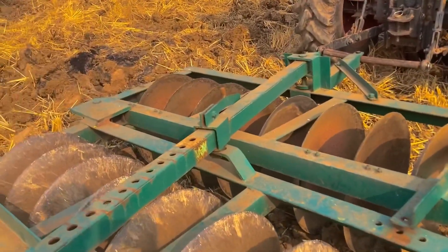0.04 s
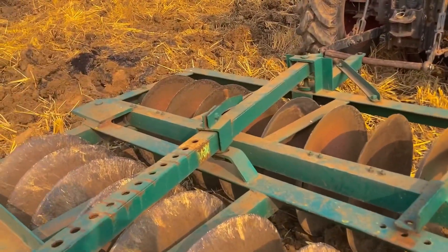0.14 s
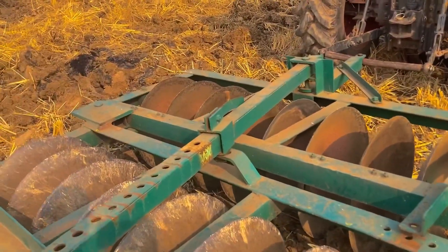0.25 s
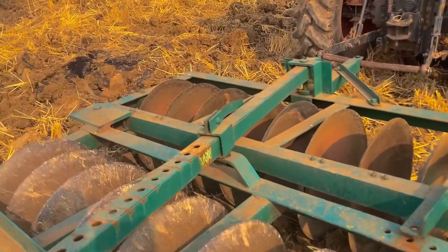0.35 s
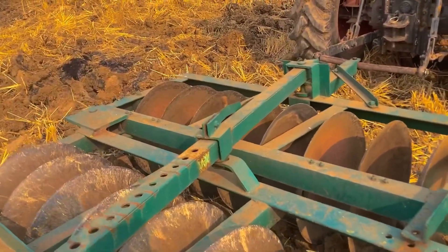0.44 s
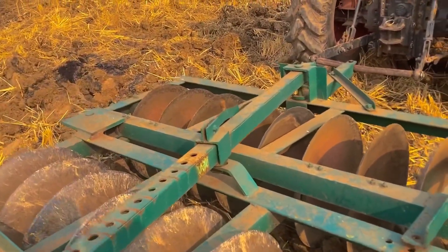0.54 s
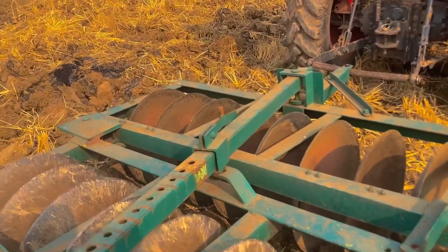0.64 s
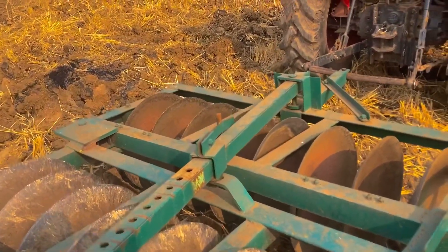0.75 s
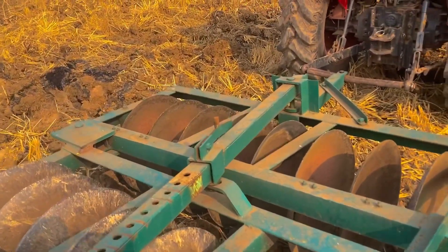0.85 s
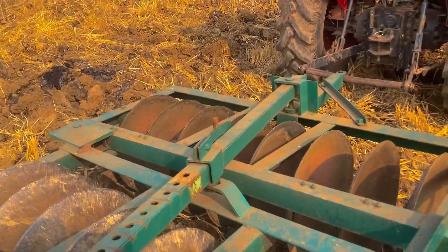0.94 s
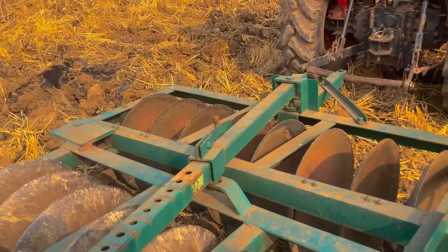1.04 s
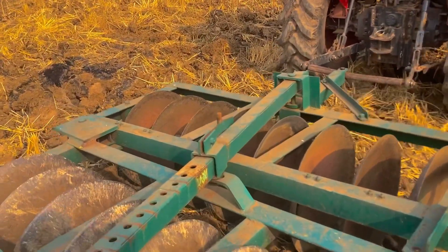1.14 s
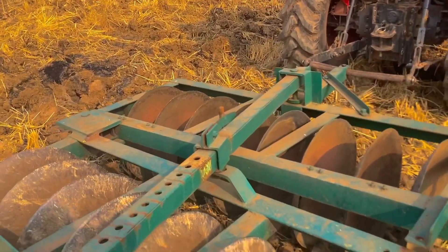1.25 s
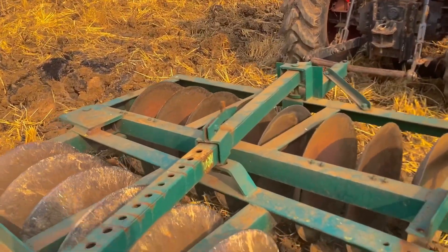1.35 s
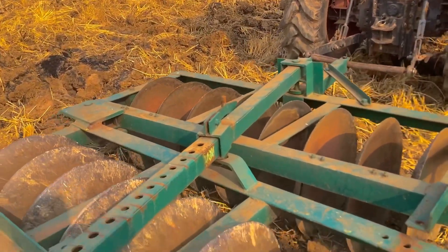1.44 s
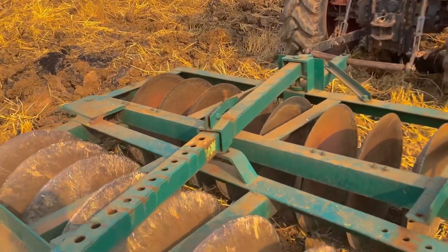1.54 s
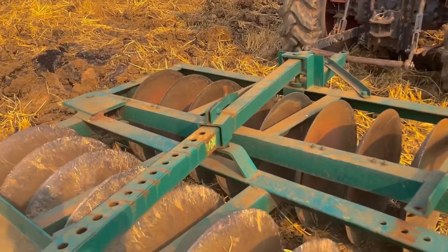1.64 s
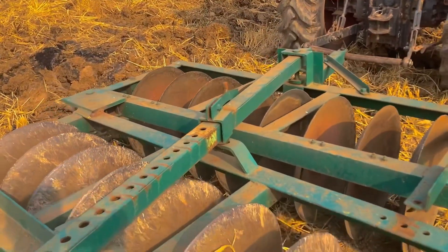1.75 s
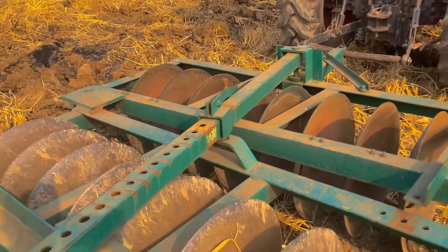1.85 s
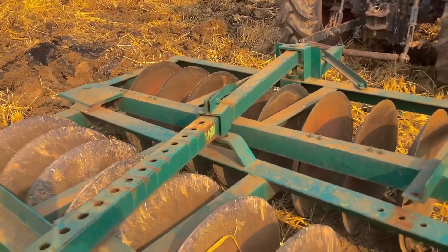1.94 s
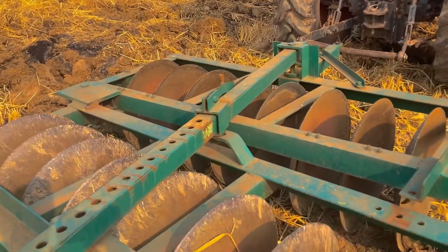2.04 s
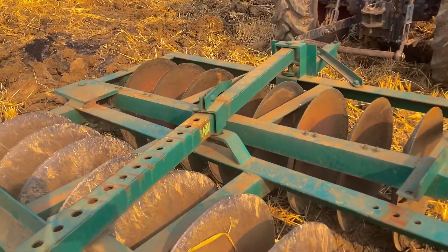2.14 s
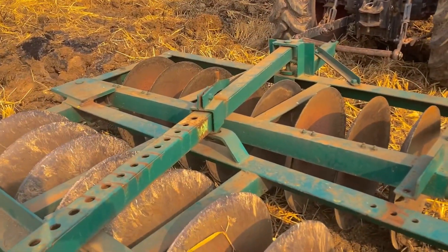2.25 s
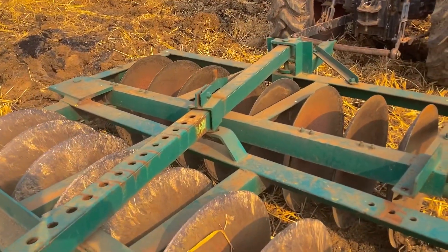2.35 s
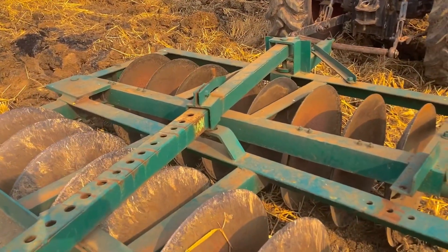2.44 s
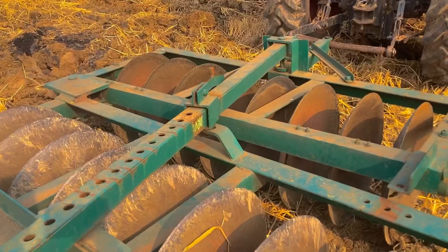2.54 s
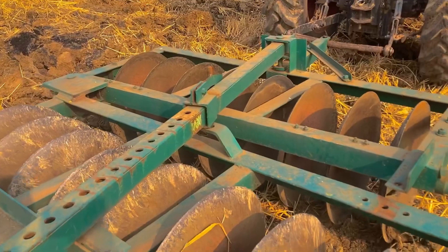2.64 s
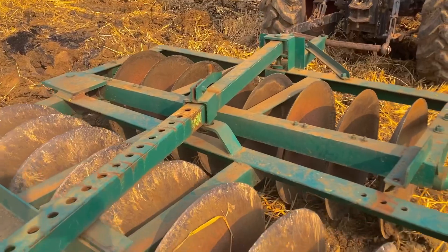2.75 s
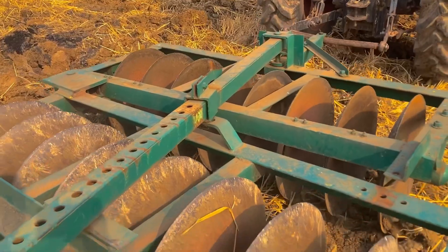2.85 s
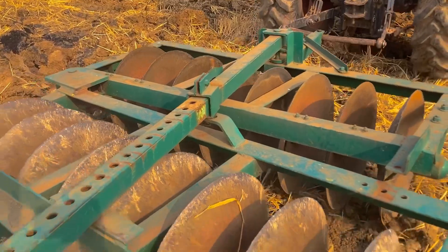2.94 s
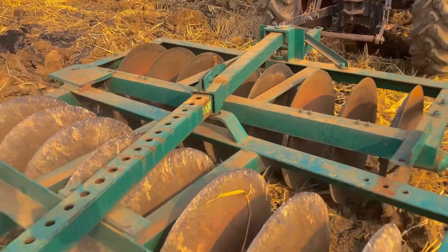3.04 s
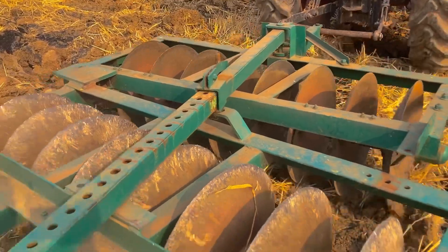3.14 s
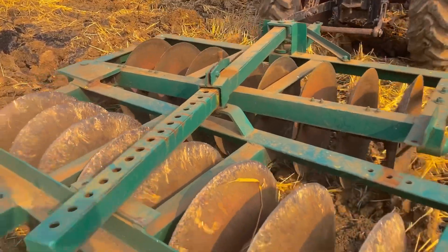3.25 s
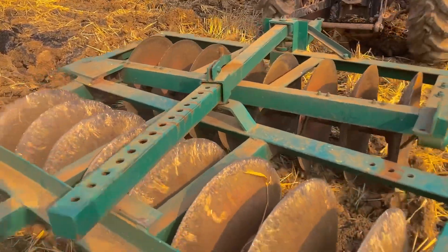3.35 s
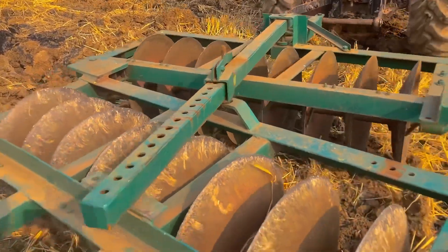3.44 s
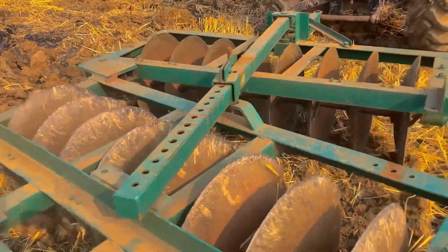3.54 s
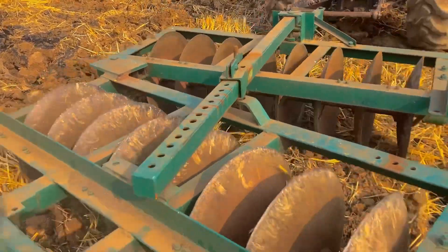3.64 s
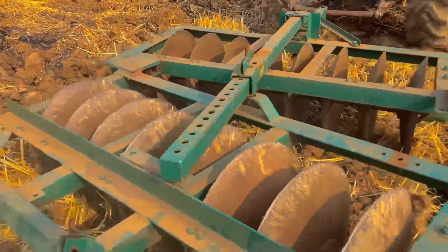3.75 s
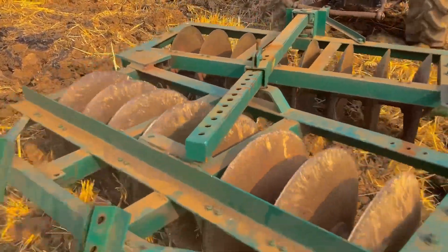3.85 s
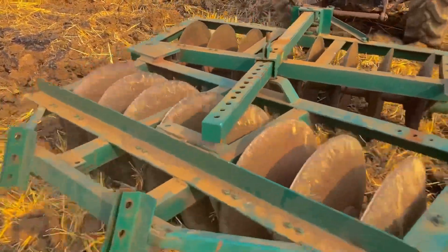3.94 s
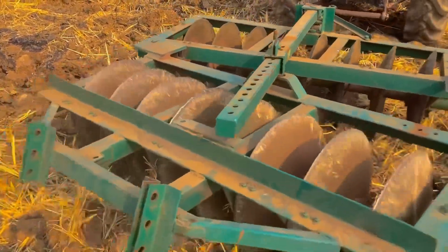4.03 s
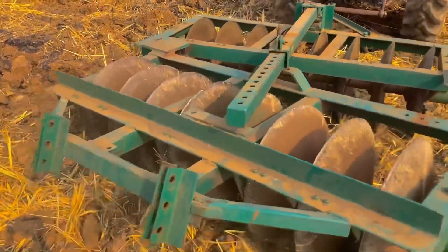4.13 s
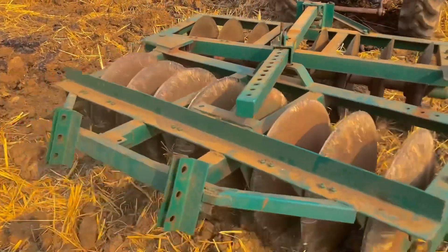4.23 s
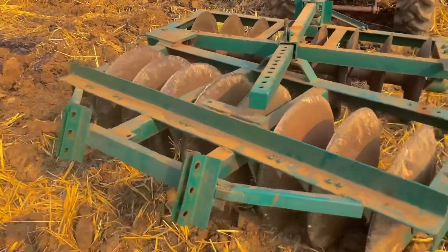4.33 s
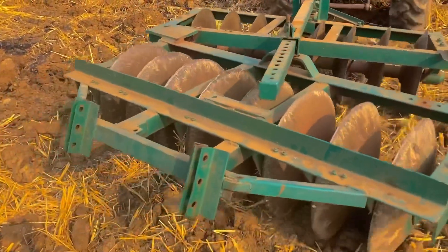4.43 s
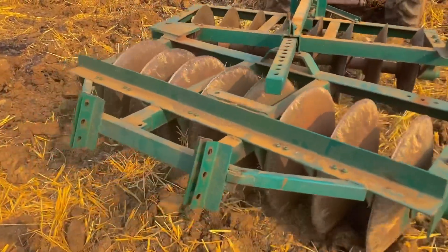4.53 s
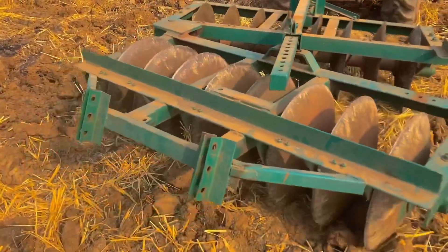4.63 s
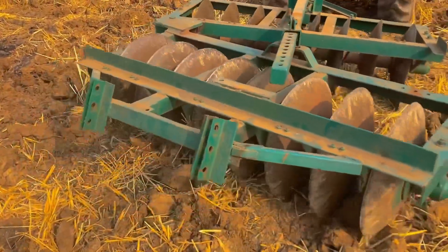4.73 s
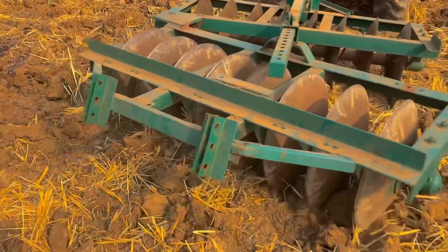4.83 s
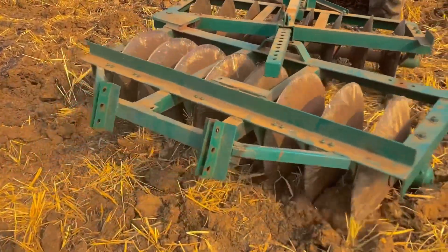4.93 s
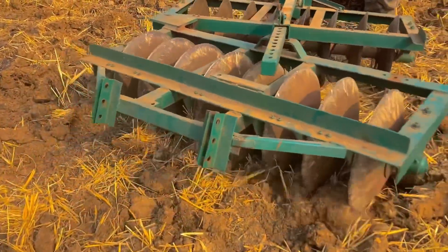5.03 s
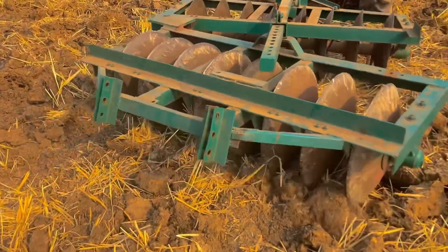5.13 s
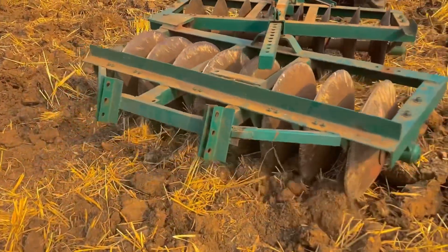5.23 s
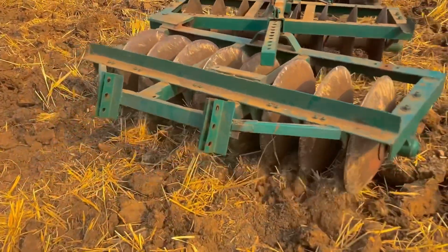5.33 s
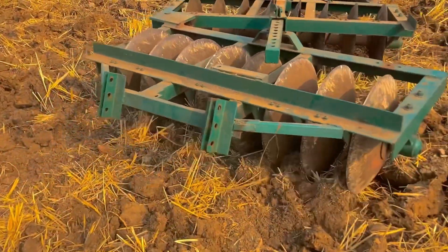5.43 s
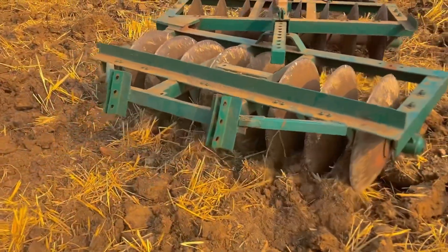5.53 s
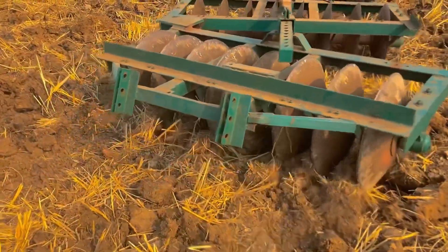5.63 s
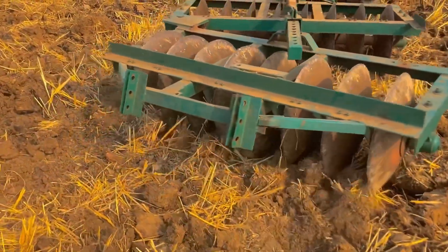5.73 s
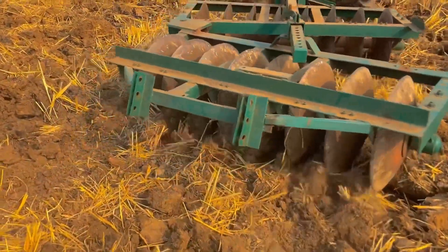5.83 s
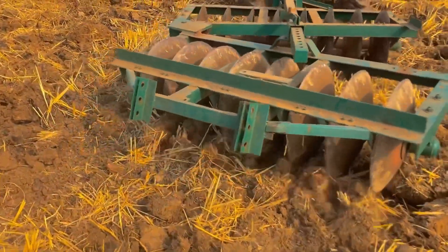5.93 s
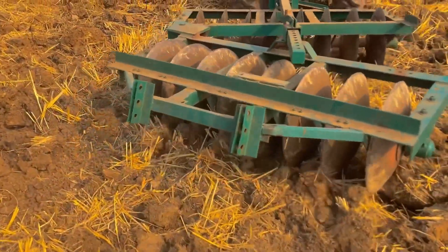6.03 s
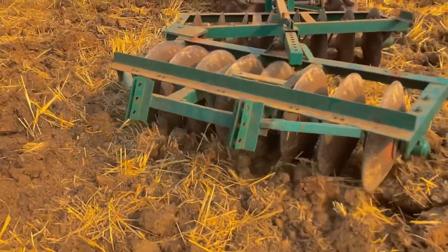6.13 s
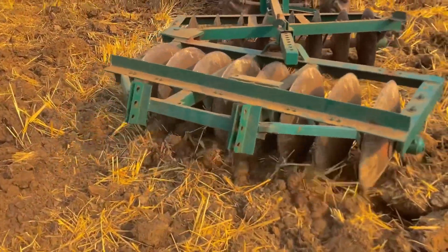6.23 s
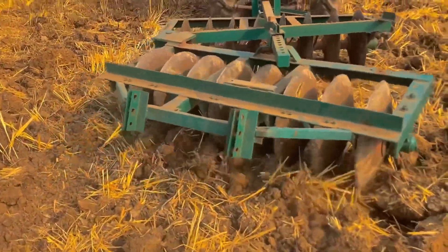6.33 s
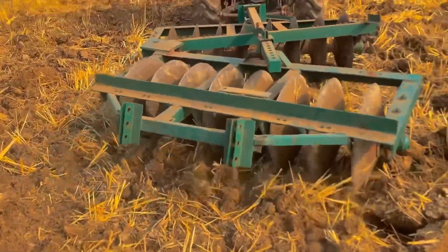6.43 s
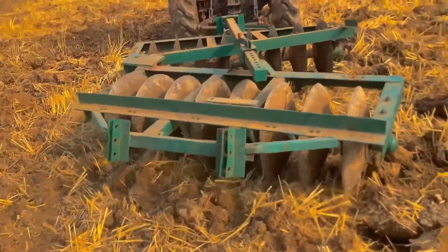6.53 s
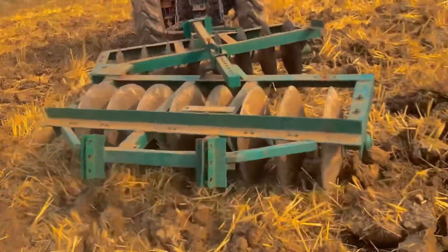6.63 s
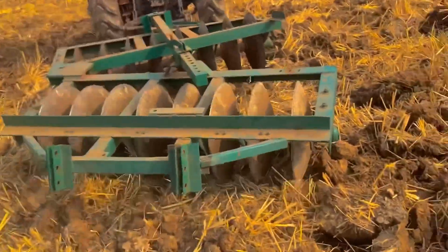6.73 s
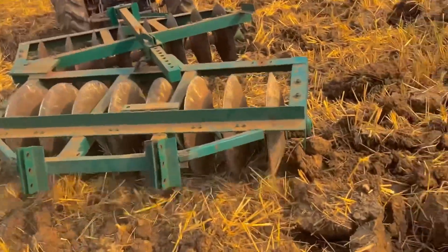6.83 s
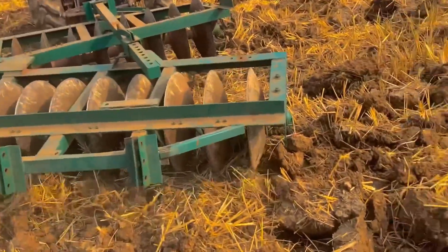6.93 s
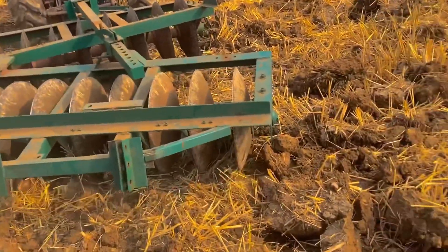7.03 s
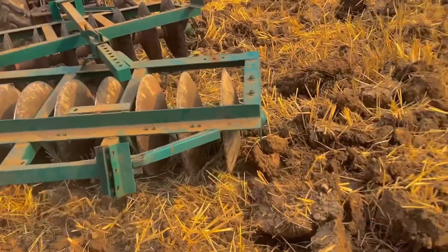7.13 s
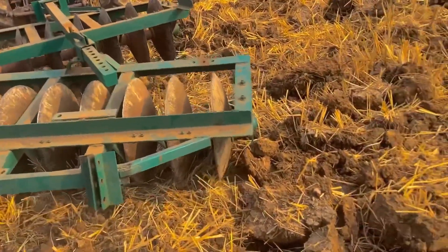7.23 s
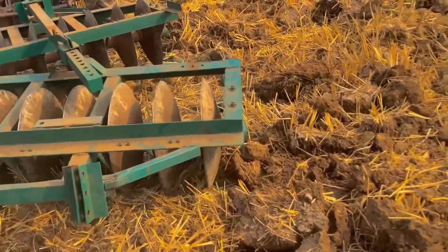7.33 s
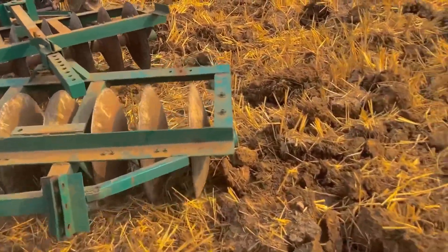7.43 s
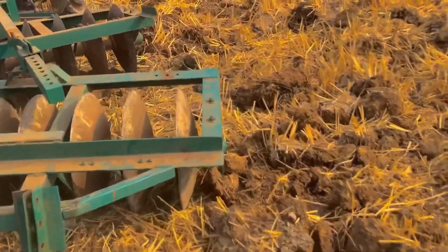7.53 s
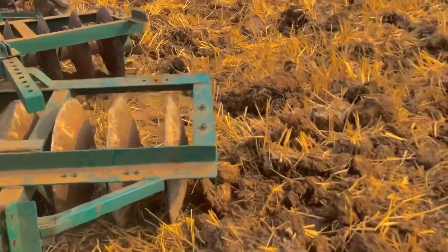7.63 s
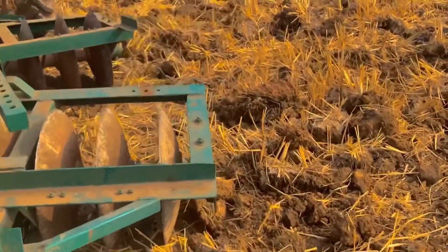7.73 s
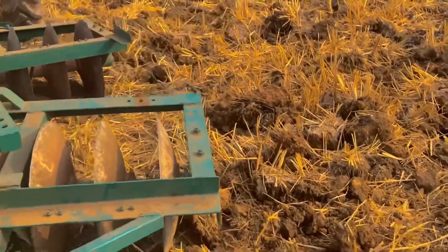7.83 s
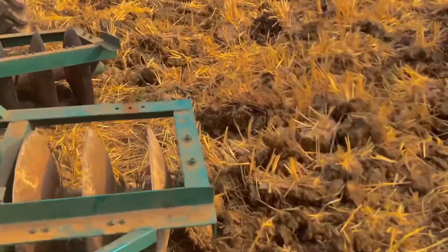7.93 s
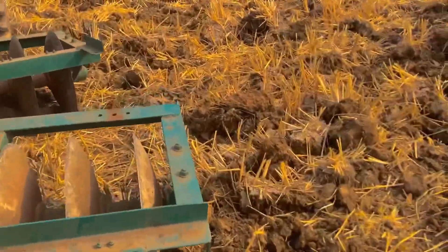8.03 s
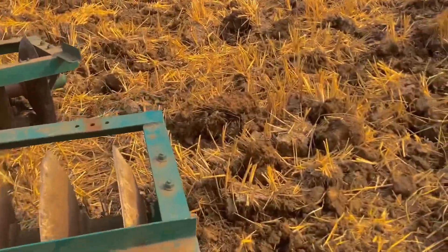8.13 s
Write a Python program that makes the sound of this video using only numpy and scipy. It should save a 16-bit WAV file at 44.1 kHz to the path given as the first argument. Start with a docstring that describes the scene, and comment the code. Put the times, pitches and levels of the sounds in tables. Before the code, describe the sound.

Heard from a phone just behind the harrow: uneven low diesel firings, each a dull thump with a hard knock and hollow boom. After three seconds the rusty discs lurch, banging and screeching through clods. The racket eases into grinding, frame thuds, short groans and crackling straw while the engine rises and falls. Late, it briefly quiets, then bright clanks cluster as the sound leans further left.

```python
"""A dry stubble field: a diesel tractor drags a disc harrow past a phone held just behind it.
Each firing sends a thump down the ringing exhaust, knocks sharply and leaves the engine block booming.
Random steel contacts shake the frame and the ringing discs into grinding, thuds and clanks; rubbing steel
groans and squeaks in wavering tones, and showers of noise make the soil and straw crackle.
Direct and scattered sound reach two ports; it lies to the left from the start and leans further left late on."""
import sys
import numpy as np
from scipy import signal
from scipy.fft import rfft, irfft, next_fast_len
from scipy.io import wavfile
from scipy.ndimage import uniform_filter1d

SR = 44100
rng = np.random.default_rng(int(sys.argv[2]) if len(sys.argv) > 2 else 0)


def file_out(sig):
    """Save sig as 16-bit WAV at sys.argv[1]."""
    # one column per channel
    cols = np.atleast_2d(sig).T
    # limit, then scale
    lim = np.clip(cols, -1, 1)
    pcm = np.round(lim * 32767).astype(np.int16)
    wavfile.write(sys.argv[1], SR, pcm)


N = 360429
TIME = np.arange(N) / SR

# colour of breaking soil and straw: (frequency [Hz], relative level [dB])
SOIL_COLOUR = [(500, -23), (2000, 0.5), (4000, -1.5), (5500, -6.5), (8000, 1), (12000, 3.5), (15500, 0.5)]


def undb(db):
    """Decibels to gain."""
    return 10 ** (np.asarray(db) / 20)


def unit(x):
    """Scale to rms 1."""
    return x / np.sqrt(np.mean(x ** 2))


def curve(table):
    """A (time, value) table, interpolated sample by sample."""
    s, value = np.transpose(table)
    return np.interp(TIME, s, value)


def gain_at(hz, points):
    """Gain of a (Hz, dB) colour at the given frequencies."""
    f, db = np.transpose(points)
    return undb(np.interp(np.log(hz + 1), np.log(f), db))


def response(points, size=8192):
    """Minimum-phase impulse response of a colour, with unit energy."""
    cepstrum = irfft(np.log(gain_at(np.fft.rfftfreq(size, 1 / SR), points)))
    # fold the cepstrum forward in time, so that nothing sounds before the impulse
    cepstrum[1:size // 2] *= 2
    cepstrum[size // 2 + 1:] = 0
    h = irfft(np.exp(rfft(cepstrum)))
    return h / np.linalg.norm(h)


def through(x, h):
    """Pass the direct and the scattered path through an impulse response."""
    return signal.oaconvolve(x, np.atleast_2d(h), axes=1)[:, :N]


def add(out, s, sound):
    """Mix a sound in at time s."""
    i = max(int(s * SR), 0)
    part = out[:, i:i + sound.shape[1]]
    part += sound[:, :part.shape[1]]


def walk(rate):
    """Slow chance: random levels, a new one every 1 / rate s, joined by ramps."""
    hold = int(SR / rate)
    levels = rng.standard_normal(N // hold + 1)
    return uniform_filter1d(np.repeat(levels, hold), hold)[:N]


def grit(rate, spread_db):
    """Tiny fractures at random moments, rate per second, most weak and a few strong."""
    size = undb(spread_db * np.minimum(rng.exponential(size=N), 5))
    struck = rng.random(N) < rate / SR
    return unit(rng.standard_normal((2, N)) * size * struck)


def patchy(x, depth_db, order=5, size=512):
    """Every slip touches the steel elsewhere: the colour changes in patches of about 30 ms."""
    _, _, frames = signal.stft(x, nperseg=size)
    field = rng.standard_normal(frames.shape)
    field = uniform_filter1d(field, order - 1, axis=0)
    field = uniform_filter1d(field, order, axis=1)
    return signal.istft(frames * undb(depth_db * unit(field)), nperseg=size)[1][:, :N]


def exhaust(thump, pipe_hz=93, t60_s=0.2, ring_db=-6.5):
    """Each pressure wave leaves the pipe and sets its air column ringing; firings in step with it make it hum."""
    t = TIME[:SR // 3]
    column = np.cos(2 * np.pi * pipe_hz * t) * undb(-60 * t / t60_s)
    ringing = signal.oaconvolve(thump, column)[:N]
    return unit(unit(thump) + undb(ring_db) * unit(ringing))


def block_ring(starts, strength, scatter_db=5.0, detune=0.02, rise_s=0.0019):
    """Each combustion strikes the modes of the block and covers, never twice in the same blend or tuning."""
    # block and cover modes: (centre pitch [Hz], mean level [dB], 60 dB decay [s])
    block_modes = [(300, 2, 0.16), (444, -2.5, 0.078), (970, -1.5, 0.079), (1190, -5.5, 0.083),
                   (1390, -4, .05), (1680, -8, .05), (2044, -6.5, 0.074), (2850, -12, .04)]
    t = TIME[:SR // 12]
    hz, db, t60 = np.transpose(block_modes)[:, :, None]
    fade = undb(db - 60 * t / t60)
    rise = 1 - np.exp(-t / rise_s)
    out = np.zeros((2, N))
    chance = rng.standard_normal((len(starts), 3, len(hz), 1))
    for i, (size, pitch, phase) in zip(starts, chance):
        swing = np.exp(2j * np.pi * (hz * (1 + detune * pitch) * t + phase))
        ring = np.sum(fade * undb(scatter_db * size) * swing, axis=0)
        add(out, i / SR, strength[i] * rise * np.array([ring.real, ring.imag]))
    return unit(out)


def engine(pulse_hz=68, pulse_s=0.011, lag_s=0.0094, knock_lag_s=0.00299, knock_rise_s=0.0055,
           knock_s=0.025, uneven_db=1.1, injection_db=-8.0, ring_db=-9, lull_knock_share=0.64):
    """Every firing sends a pressure wave out of the pipe, knocks sharply and leaves the block booming."""
    # engine speed, sagging under load and picking up: (time [s], firings [per s])
    speed = [(0.0, 14.99), (0.95, 14.35), (1.08, 12.65), (2.09, 13.87), (2.3, 12.18), (2.57, 13.03),
             (3.14, 8.41), (3.42, 16.4), (3.75, 23.83), (3.84, 21.6), (4.02, 14.6), (4.21, 21.0),
             (4.36, 16.9), (4.6, 15.04), (4.74, 16.04), (5.63, 13.65), (5.85, 15.94), (6.1, 22.34),
             (6.36, 25.73), (6.61, 17.42), (8.17, 19.92)]
    # engine effort, as the level of the exhaust beat before the lulls: (time [s], level [dB])
    effort = [(0, -36), (0.36, -37.5), (0.45, -34), (0.78, -37.5), (0.9, -35.5), (1.4, -35.5), (3.15, -34),
              (3.4, -30), (3.7, -26.5), (3.93, -36), (4.5, -38), (4.72, -31), (5.75, -29.5), (5.95, -29),
              (6.02, -24), (6.36, -24), (6.41, -36), (6.5, -37), (6.83, -24.5), (6.98, -34.5), (7.75, -30),
              (8.17, -34)]
    # loose rumble of gas against the exhaust pulses: (time [s], level [dB])
    gas_share = [(0, -6), (2.6, -6), (4.2, -1), (5.8, -4), (6.35, -9), (6.6, 0), (8.17, -1)]
    # a few beats go soft as the fuel is cut: (time [s], half length [s], exhaust dip [dB])
    lulls = [(0.25, 0.12, 8.5), (0.66, 0.089, 5.5), (1.073, 0.19, 4.5), (4.98, 0.18, 7), (6.71, 0.12, 9)]
    # firings that knock harder than the rest: (time [s], extra level [dB])
    hard_firings = [(0.296, 5), (0.51, 1.5), (0.71, 0.5), (0.92, 3.5), (2.2, 3)]
    # the knock and ring fade as the tractor draws away: (time [s], level [dB])
    receding = [(0, 0.5), (4.0, 0.5), (7.0, -1), (8.17, -10)]
    # colours of the exhaust gas, the block's boom and the knock: (frequency [Hz], relative level [dB])
    pipe_colour = [(20, -34), (30, -7), (42, -4), (72, -9.5), (98, -0.5), (125, -6.5), (145, -13.5),
                   (200, -25), (400, -49), (900, -79)]
    block_colour = [(80, -11), (170, -11), (250, 1), (330, -1.5), (470, -3), (650, -19), (1000, -7.5),
                    (1400, -30.5), (2800, -29), (5000, -50), (15000, -51)]
    knock_colour = [(400, 2.5), (680, -8), (1000, 4), (1380, -5), (1700, 3), (2050, -1.5), (2500, -10),
                    (2850, -13), (4000, -20.5), (7000, -20), (15000, -20)]

    rate = curve(speed)
    effort_db = curve(effort)
    lull_db = sum(depth * np.exp(-((TIME - s) / half) ** 2) for s, half, depth in lulls)
    # the block sits at -42 dB for an effort of -35 dB and gains 0.54 dB per dB of effort
    block_db = -42 + 0.54 * (effort_db + 35) - lull_knock_share * lull_db
    turns = np.cumsum(rate) / SR + 2 / 3  # one whole turn per firing
    age = (turns % 1) / rate
    # time from the nearest pressure peak and since the last diesel knock
    peak = ((turns - lag_s * rate + .5) % 1 - .5) / rate
    burn = ((turns - knock_lag_s * rate) % 1) / rate

    # exhaust: the pulses stay on the direct path, the gas is on both
    thump = np.exp(-(peak / pulse_s) ** 2) * np.cos(2 * np.pi * pulse_hz * peak)
    pulses = exhaust(thump) * np.array([[1], [0]])
    gas = through(rng.standard_normal((2, N)) * (np.exp(-age / .03) + .35), response(pipe_colour))
    rumble = undb(curve(gas_share))
    pipe = (pulses + rumble * unit(gas)) / np.hypot(1, rumble)

    swell = 2 * (1 - np.exp(-age / .009)) * np.exp(-age / .028) + .33
    boom = through(grit(7000, 1.5) * swell, response(block_colour))

    # each firing knocks with its own strength
    firing = (turns - knock_lag_s * rate).astype(int)
    firing_db = uneven_db * rng.standard_normal(N // 1000)
    for s, db in hard_firings:
        firing_db[firing[int(s * SR) + SR // 50]] += db
    strength = undb(firing_db)[firing]
    burst = (1 - np.exp(-burn / knock_rise_s)) * np.exp(-(burn / knock_s) ** 3) * strength + 0.19
    knock = through(grit(7000, 1.5) * burst * undb(1.2 * walk(160)), response(knock_colour))
    ring = block_ring(np.flatnonzero(np.diff(firing)), strength)

    near = undb(curve(receding))
    body = patchy(unit(boom) + undb(injection_db) * unit(knock) * near, depth_db=1.5)
    block = body + undb(ring_db) * ring * near
    return pipe * undb(effort_db - lull_db) + block * undb(block_db)


def discs(force, ring_db, damping, waver_s=0.001218):
    """Steel discs in soil: a dead clatter plus their ringing modes, which waver in pitch as the load shifts."""
    # disc modes: (pitch [Hz], relative level [dB], 60 dB decay before the damping by soil [s])
    disc_modes = [(472, -1, 0.61), (768, 0, 1), (840, -21, 0.087), (910, -3, 0.24), (967, 8, 0.49),
                  (978, 7.5, 0.57), (1100, 2, 0.44), (1300, 13, 0.15), (1290, -9, 0.43), (1517, 7, 0.78),
                  (1639, 12, 0.26), (1780, -14, 0.2), (2015, 7, 0.46), (2250, -22, 0.067), (2636, 5, 0.38),
                  (2630, -11, 0.23), (2900, 2.5, 0.44), (3153, 11, 0.086), (3550, 1, 0.35), (3916, 5, 0.18),
                  (4280, 3, 0.17), (4530, -11, 0.15), (5150, 1, 0.14), (6800, -5.5, 0.32)]
    # dead clatter of the steel: (frequency [Hz], relative level [dB])
    steel_colour = [(150, -6.5), (400, -4), (620, -4.5), (800, 2), (1050, -5), (1400, 7.5), (1700, -2.5),
                    (2100, -5), (3200, -17.5), (4400, -13.5), (5600, -22), (8000, -22), (15000, -32)]
    t = TIME[:SR // 2]
    ring = np.zeros((2, len(t)))
    for hz, db, t60 in disc_modes:
        tone = np.sin(2 * np.pi * (hz * t + rng.random((2, 1))))
        ring += undb(db) * tone * undb(-60 * t * damping / t60)
    steady = through(force, ring / np.linalg.norm(ring[0]))
    # reading the ring a little early or late bends its pitch
    warped = TIME + waver_s * walk(11)
    ringing = np.array([np.interp(warped, TIME, path) for path in steady])
    return through(force, response(steel_colour)) + undb(ring_db) * ringing


def rub(hz, length, glide, rough, stutter_db=2.5):
    """One stick-slip burst: a gliding, stuttering tone of rms 1 that wavers differently on each path."""
    u = np.linspace(-.5, .5, int(np.clip(length * SR, 64, SR // 7)))
    # the pitch jumps every 40 samples, the grip drifts over about 4 ms
    slip = np.repeat(rng.standard_normal((2, 160)), 40, axis=1)[:, :len(u)]
    grip = np.interp(u * length, np.linspace(-.1, .1, 50), rng.standard_normal(50))
    turns = np.cumsum(hz * (1 + glide * u + rough * slip), axis=1) / SR
    tone = np.sin(2 * np.pi * (turns + rng.random()))
    return unit(np.hanning(len(u)) * undb(stutter_db * grip) * tone)


def scrapes(count=550, centre_hz=1700, octaves=.5, spread_db=2.5, rough=0.079):
    """Hard crumbs dragged along the rims, each a brief rasp with its own pitch."""
    out = np.zeros((2, N))
    moments = rng.random((count, 2))
    characters = np.clip(rng.standard_normal((count, 3)), -2, 2)
    for (when, long), (pitch, size, glide) in zip(moments, characters):
        burst = rub(centre_hz * 2 ** (octaves * pitch), 0.012 + 0.046 * long, 0.014 * glide, rough)
        # higher rasps are weaker
        add(out, when * N / SR, undb(spread_db * size - 3 * pitch) * burst)
    return unit(out)


def harrow(crumble_s=0.012, crumble_db=-2, uneven_db=2.0, thud_rise_s=0.035, thud_decay_s=0.022):
    """Clods boom in the frame and grind along the disc rims in uneven slips; soil and straw crumble."""
    # how hard the discs bite, as the level of their grinding before its unevenness: (time [s], level [dB])
    bite = [(0, -55), (.9, -53.5), (1.55, -44), (2.2, -53.5), (2.8, -43.5), (3.03, -40), (3.27, -33.5),
            (3.53, -21.5), (3.65, -26), (3.8, -27.5), (3.98, -31.5), (4.7, -33), (4.8, -32), (4.95, -29),
            (5.1, -36), (5.75, -39), (6.33, -31.5), (6.82, -36.5), (7.1, -48), (7.75, -30.5), (8.17, -38.5)]
    # crumbling soil and straw: (time [s], level [dB])
    crumble = [(0, -55), (.7, -75), (1.2, -46.5), (1.85, -48), (2.1, -59), (2.5, -55), (3.0, -39),
               (3.52, -32.5), (4.45, -37), (4.9, -31.5), (5.35, -39.5), (6.35, -31), (6.84, -34.5),
               (7.12, -49), (7.6, -37.5), (8.17, -38.5)]
    # big clods thudding against the frame: (time [s], relative level [dB])
    thud_times = [(1.53, -25), (1.76, -33), (2.2, -37), (2.67, -27.5), (3.325, -28), (3.515, -19),
                  (3.79, -12), (4.02, -16), (4.52, -21), (4.93, -20.5), (5.23, -34), (6.07, -17.5),
                  (6.2, -22), (6.36, -15.5), (7.72, -19.5), (7.92, -19)]
    # boom of the frame: (frequency [Hz], relative level [dB])
    frame_colour = [(60, -23.5), (140, -2), (220, -10), (280, -3), (335, 2), (400, -3), (470, -6.5),
                    (580, -19), (1000, -39.5)]

    bite_db = curve(bite) + uneven_db * walk(11)
    age = TIME[:SR // 3]
    thud = 2 * (1 - np.exp(-age / thud_rise_s)) * np.exp(-age / thud_decay_s)
    thuds = np.zeros((1, N))
    for s, db in thud_times:
        add(thuds, s, undb(db) * np.atleast_2d(thud))
    # the frame drones at -31.5 dB for a bite of -30 dB and gains 0.72 dB per dB of bite
    drone = undb(-31.5 + 0.72 * (bite_db + 30))
    push = np.hypot(drone, thuds)
    shaking = grit(1800, 1.45) * undb(2.0 * walk(25))
    frame = unit(patchy(through(shaking, response(frame_colour)), depth_db=-0.5))

    slips = grit(1800, 2.4) * undb(2.6 * walk(70) + 1.5 * walk(28))
    clatter = discs(slips, ring_db=-1.0, damping=1.6)
    grind = unit(unit(patchy(clatter, depth_db=0.5)) + undb(-7.5) * scrapes())

    # the larger fractures each shed a short shower of crumbs
    t = TIME[:SR // 25]
    shower = rng.standard_normal(len(t)) * np.exp(-t / crumble_s)
    cracks = grit(7000, 1.6) + undb(crumble_db) * unit(through(grit(400, 1.7), shower))
    crackle = through(cracks * undb(1.0 * walk(45)), response(SOIL_COLOUR))
    soil = unit(patchy(crackle, depth_db=2.5))
    return frame * push + grind * undb(bite_db) + soil * undb(curve(crumble))


def snaps(snap_s=0.016, snap_db=11.0):
    """Brittle stalks and clods break with a short bright crack."""
    # straws and dry clods snapping: (time [s], level before the common gain [dB])
    snap_times = [(0.166, -59.5), (0.484, -59), (0.7577, -60), (0.827, -60), (0.895, -64), (1.1614, -51.5),
                  (1.4005, -50), (2.328, -53), (2.408, -53.5), (2.486, -51), (2.563, -48), (3.0754, -52),
                  (3.099, -44), (3.3694, -40), (3.517, -34), (3.814, -27), (4.876, -38), (4.995, -38),
                  (6.198, -32.5), (7.9486, -31.5)]
    t = TIME[:SR // 20]
    force = np.zeros((2, N))
    for s, db in snap_times:
        crack = rng.standard_normal((2, len(t))) * np.exp(-t / snap_s)
        add(force, s, undb(db + snap_db) * crack)
    return through(force, response(SOIL_COLOUR))


def clanks(chatter_s=0.02, rattle_db=1.0, clank_db=-6.0, edge_db=-4.5, edge_s=0.028, clang_db=-1,
           clang_rise_s=0.0052, clang_t60_s=0.3):
    """Each knock is a rattling run of steel contacts with a bright edge; the row of discs clangs after it."""
    # slack joints and discs knocking:
    # (time [s], level before clank_db [dB], level of the bright edge before edge_db [dB], rise [s])
    knocks = [(1.528, -40, -33.5, .003), (2.483, -38, -64, 0.00054), (2.563, -49, -56, .001),
              (3.042, -41, -26.5, 0.0033), (3.103, -25, -22.5, 0.0025), (3.312, -14, -54, 0.0054),
              (3.383, -26, -54, 0.0018), (3.435, -14.5, -22, .003), (3.456, -5, -40, 0.014),
              (3.516, -5, -15.5, 0.0055), (3.562, -14, -41, 0.00089), (3.592, -32, -48, .001),
              (3.688, -16.5, -48, .005), (3.734, -11.5, -40, 0.0028), (3.785, -11, -35, 0.0023),
              (3.815, -23, -27, 0.0013), (3.959, -26, -27, .001), (4.013, -13, -41, 0.0051),
              (4.21, -32, -23.5, 0.00075), (4.361, -23, -32, 0.0034), (4.571, -22, -24, 0.0019),
              (4.619, -38, -45, .003), (4.776, -44, -20, 0.0078), (4.919, -16.5, -26, 0.0017),
              (5.156, -13, -24.5, 0.0067), (5.181, -18.5, -39, 0.0024), (5.61, -27.5, -32, .0004),
              (5.648, -28, -37, .002), (5.688, -32, -38, .002), (5.895, -26.5, -46, .003),
              (5.948, -22.5, -31, 0.0035), (6.321, -15.5, -24.5, 0.0021), (6.581, -43, -24.5, 0.0055),
              (6.806, -10.5, -20.5, 0.00099), (6.833, -16.5, -38, .001), (7.03, -26.5, -43, 0.00088),
              (7.42, -40, -34, .005), (7.515, -41, -55, .002), (7.632, -15.5, -20, 0.00087),
              (7.665, -15, -42, 0.002), (7.695, -17.5, -40, .0006), (7.717, -10, -36, 0.00051),
              (7.735, -13.5, -38, 0.00076), (8.131, -33, -31.5, 0.0023)]
    # colours of the bright edge and of the clang: (frequency [Hz], relative level [dB])
    edge_colour = [(800, -17.5), (2000, 11.5), (3200, 7), (4400, -3.5), (5600, -3.5), (7200, -3.5),
                   (10000, 3), (15000, -37)]
    clang_colour = [(450, -41), (680, -2.5), (820, -6.5), (1000, 3.5), (1200, 0), (1400, -24),
                    (2100, -12.5), (3000, -25), (6000, -46)]
    t = TIME[:SR // 4]
    force, edge, clang = np.zeros((3, 2, N))
    contacts = unit(grit(4000, 0.87) * undb(rattle_db * walk(170)))
    # many close modes build up and fade together, other ones for every knock
    fade = (1 - np.exp(-t / clang_rise_s)) * undb(-60 * t / clang_t60_s)
    for s, db, bright_db, rise_s in knocks:
        i = int(s * SR)
        run = contacts[:, i:i + len(t)]
        age = t[:run.shape[1]]
        run = run * (1 - np.exp(-age / rise_s))
        blow = undb(db + clank_db) * run * np.exp(-age / chatter_s)
        tail = rng.standard_normal((2, len(t))) * fade / np.linalg.norm(fade)
        start = s - .002  # the rise begins just ahead
        add(force, start, blow)
        add(clang, start, signal.fftconvolve(blow, tail, axes=1))
        add(edge, start, undb(bright_db + edge_db) * run * np.exp(-age / edge_s))
    steel = discs(force, ring_db=-6.0, damping=1.85)
    row = undb(clang_db) * through(clang, response(clang_colour))
    return steel + row + through(edge, response(edge_colour))


def squeaks():
    """Stick-slip of steel on steel: joints groan and rims squeak on their scrapers."""
    # groans and squeaks, cut at 1/7 s:
    # (time [s], pitch [Hz], length [s], rms level [dB], glide [share of pitch], roughness [share of pitch])
    rubs = [(3.004, 338, 0.1, -32, .13, 0.059), (2.99, 1550, .11, -36.5, 0, 0.16),
            (3.081, 391, 0.084, -34, 0.086, .037), (3.25, 8240, .03, -40.5, .04, .01),
            (3.299, 1458, .11, -28, 0, .13), (3.434, 1000, 0.092, -24, 0.00097, 0.032),
            (3.488, 6700, 0.081, -31.5, 0.14, 0.047), (3.515, 478, 0.088, -23, -0.015, 0.097),
            (3.514, 3300, 0.062, -26, 0.28, 0.11), (3.54, 4110, 0.038, -34, .05, 0.054),
            (3.677, 1397, 0.05, -28, 0.076, .1), (3.724, 1082, 0.033, -26.5, 0.13, 0.059),
            (3.554, 1400, 0.049, -24.5, -0.117, 0.18), (3.758, 1670, 0.055, -31.5, -0.12, 0.17),
            (3.8, 3700, .045, -36, .1, 0.12), (4.002, 343, 0.076, -28, 0.21, 0.048),
            (4.2, 1480, 0.05, -31, -0.075, 0.084), (4.259, 2127, 0.086, -38, 0.1, 0.24),
            (4.336, 1102, 0.085, -34, -0.12, 0.04), (4.463, 361, 0.049, -37, 0.1, 0.087),
            (4.481, 3550, 0.11, -37, 0.097, 0.17), (4.553, 346, 0.057, -28.5, -0.084, 0.022),
            (4.67, 370, 0.053, -26, 0.068, .036), (4.762, 341, 0.08, -33.5, -0.082, 0.044),
            (4.867, 11700, .025, -35.5, 0, .0073), (4.795, 2260, 0.15, -36.5, -0.16, 0.28),
            (4.898, 1500, 0.097, -32, -.1, 0.17), (4.914, 356, 0.089, -31, 0.053, 0.062),
            (5.101, 438, 0.089, -34, 0.043, 0.023), (5.212, 2110, 0.085, -42, -0.097, 0.015),
            (5.5, 2460, 0.054, -44.5, 0.16, 0.017), (5.604, 2050, 0.016, -34.5, -0.077, 0.043),
            (5.642, 1980, 0.11, -39.5, -0.093, 0.067), (6.304, 338, 0.12, -34, 0.037, .02),
            (6.427, 326.3, 0.1, -35, 0.07, .015), (6.548, 352.5, 0.12, -39, 0.072, 0.015),
            (6.689, 394, 0.092, -40, -0.011, 0.02), (6.699, 446, 0.13, -41, 0, 0.013),
            (7.1, 439, 0.12, -40, .02, .015), (7.02, 4550, 0.034, -48, -0.021, 0.04),
            (7.651, 4450, 0.043, -27, .028, 0.15), (7.656, 4450, 0.068, -29.5, 0.11, 0.047),
            (7.655, 2400, 0.037, -33.5, 0.04, 0.196), (7.709, 2050, 0.042, -29.5, -0.04, 0.15),
            (7.706, 1180, 0.12, -31, 0.03, .05), (7.709, 4030, 0.11, -32, .0094, 0.082),
            (7.919, 5660, 0.028, -40, 0, 0.025), (7.9, 2470, 0.025, -39, -0.012, .04),
            (7.91, 2800, 0.044, -31, 0.056, 0.031), (7.933, 4370, 0.038, -34.5, .027, 0.042),
            (7.93, 6500, 0.016, -35, .051, .025), (7.947, 3990, 0.12, -44.5, 0.023, 0.013),
            (8.117, 3980, 0.037, -43.5, .0065, 0.034)]
    out = np.zeros((2, N))
    for s, hz, length, db, glide, rough in rubs:
        add(out, s, undb(db) * rub(hz, length, glide, rough))
    return out


def scene():
    """Direct and scattered sound reach the two ports of the phone with different phase and level."""
    # between the ports: (frequency [Hz], phase by which left leads [rad])
    port_phase = [(0, 0), (500, .05), (1400, .7), (2100, 5.8), (3100, 8.8), (4100, 12.8), (5500, 15.4),
                  (6500, 12.7), (7450, 12.4), (8600, 9.5), (9500, 9.3), (10900, 6.35), (11800, 6.2),
                  (13300, 3.2), (14200, 3.05), (15300, 0)]
    # between the ports: (frequency [Hz], left minus right [dB])
    port_balance = [(60, -9.5), (430, -8.5), (640, -16), (1300, -3.5), (2400, 4.5), (4400, 2.5),
                    (8000, 2.5)]
    # scattered sound: (frequency [Hz], gain [dB])
    scatter = [(60, 0), (300, -51), (700, -10.5), (2000, -1.5), (4500, -3), (6500, -0.5), (8500, -65),
               (15000, -39)]
    # how far the sound lies to the left, most of the way from the start: (time [s], share [0-1])
    left_share = [(6.45, 0.77), (6.75, 0.83), (7.5, 0.97)]
    # what lying fully left adds: (frequency [Hz], phase by which left leads [rad], left minus right [dB])
    leftward = [(448, 0.42, 10.5), (706, 2.5, 20.5), (1024, -1.93, 11.5), (1375, 3.5, 4.5),
                (1850, 1.04, -2), (3500, 0.5, -2.5), (6000, 0, -3)]

    size = next_fast_len(N + SR // 10)
    direct, scattered = rfft(engine() + harrow() + snaps() + clanks() + squeaks(), size)
    hz = np.fft.rfftfreq(size, 1 / SR)
    scattered = scattered * gain_at(hz, scatter)
    lean = np.sqrt(gain_at(hz, port_balance))
    lag = np.exp(-1j * np.interp(hz, *np.transpose(port_phase)))
    ahead = np.array([(direct + scattered) * lean, (direct - scattered) * lag / lean])
    # lying left shifts phase and level between the ports, mostly in favour of the left
    f, late, tilt_db = np.transpose(leftward)
    tilt = undb(np.interp(hz, f, tilt_db) / 2)
    late_right = np.exp(-1j * np.interp(hz, f, late))
    aside = ahead * np.array([tilt, late_right / tilt])
    share = np.clip(curve(left_share), 0, 1)
    return irfft(ahead, size)[:, :N] * (1 - share) + irfft(aside, size)[:, :N] * share


def record(dry, bass_hz=28, top_hz=15800):
    """The phone drops the deepest bass, rounds the loudest peaks and cuts the top."""
    thin = signal.sosfilt(signal.butter(4, bass_hz, "highpass", fs=SR, output="sos"), dry)
    rounded = np.tanh(thin)
    return signal.sosfilt(signal.ellip(10, .2, 70, top_hz, fs=SR, output="sos"), rounded)


dry = scene()
out = record(dry)
file_out(out)
```